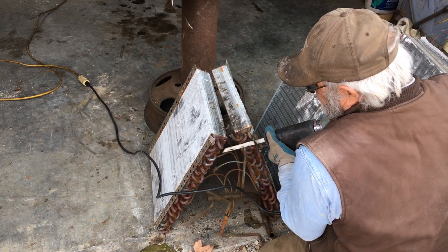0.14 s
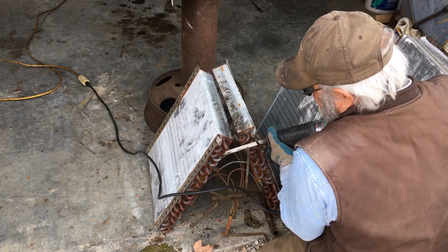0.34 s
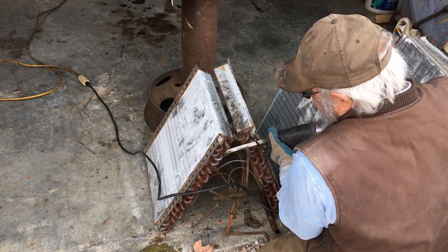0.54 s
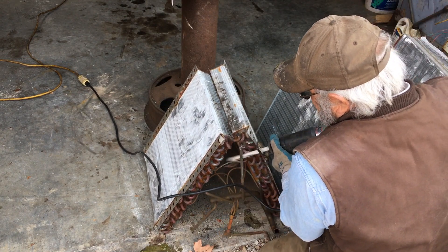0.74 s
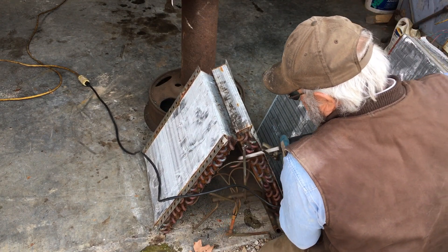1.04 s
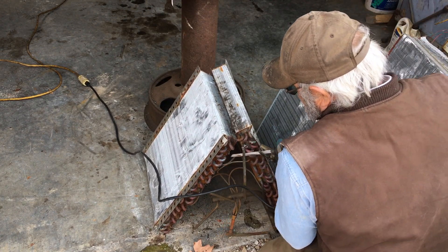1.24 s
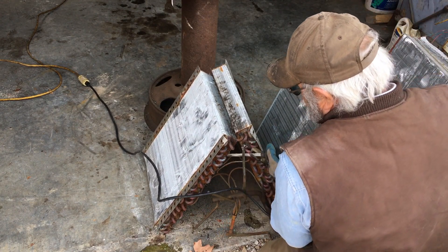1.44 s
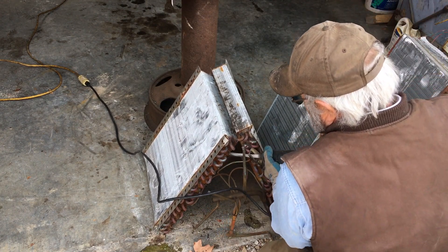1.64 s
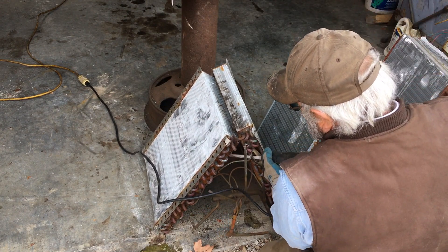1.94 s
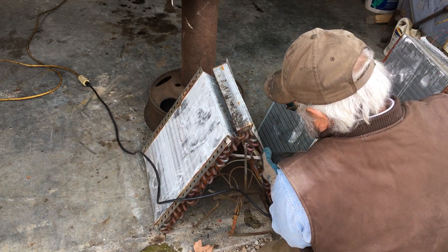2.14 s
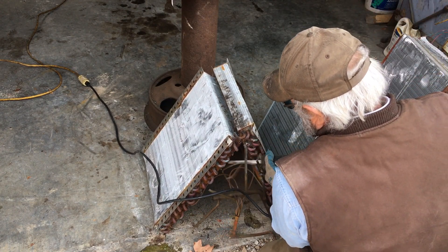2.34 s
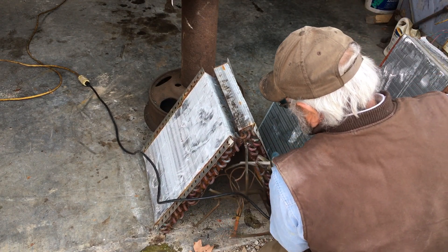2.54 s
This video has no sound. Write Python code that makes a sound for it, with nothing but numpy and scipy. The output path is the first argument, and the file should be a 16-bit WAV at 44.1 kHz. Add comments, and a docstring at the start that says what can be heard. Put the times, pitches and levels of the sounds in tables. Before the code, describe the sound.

Close by over a concrete floor, an electric reciprocating saw bites into ringing copper tubing. It winds down with metallic knocks and scrapes, then whines back up into a second rattling cut that shakes the coil.

```python
"""Reciprocating saw on a copper coil

A corded saw cuts the tubes, close by in an open workspace. It runs, coasts almost to rest, speeds up
and begins to slow. Teeth rasp twice a stroke and bite in; gears rattle in their housing; the loose
blade knocks and pings in two spells. The tube rings and groans and the coil frame shakes."""
import sys
import numpy as np
from scipy import signal
from scipy.fft import rfft, irfft
from scipy.io import wavfile

SR = 44100
rng = np.random.default_rng(int(sys.argv[2]) if len(sys.argv) > 2 else 0)


def waveform_to_disk(signal):
    """Save audio, clipped to [-1, 1], as 16-bit WAV at the path in sys.argv[1]."""
    frames = np.transpose(np.atleast_2d(signal))
    scaled = np.clip(frames, -1, 1) * 32767
    samples = np.round(scaled).astype(np.int16)
    wavfile.write(sys.argv[1], SR, samples)


N = 119070
FFT_SIZE, TOP_HZ = 2 ** 18, 16000
T, HZ = np.arange(N) / SR, np.arange(FFT_SIZE // 2 + 1) * SR / FFT_SIZE + 1e-6
TEETH_PER_STROKE, TOOTH_SCATTER_DB, RING_WIDTH_HZ = 90, 3.5, 22.6

# saw speed (time [s], stroke rate [Hz])
STROKE_RATE = [(0, 30.4), (.2, 31.8), (.45, 28), (.65, 30.2), (.85, 36.5), (.98, 34.3), (1.1, 25.2),
               (1.25, 20.2), (1.45, 15.2), (1.66, 11.63), (1.76, 26), (1.95, 37), (2.15, 40), (2.5, 41),
               (2.7, 30.5)]

# envelopes (time [s], relative level [dB])
RASP_LEVEL = [(0, -33), (.17, -28.5), (.27, -25), (.32, -27.5), (.43, -30.5), (.55, -31.5), (.82, -33.5),
              (.89, -27.5), (1.02, -36), (1.14, -39), (1.27, -45.5), (1.5, -45.5), (1.665, -51),
              (1.73, -35), (1.88, -36), (1.97, -30.5), (2.25, -28.5), (2.32, -33), (2.44, -30), (2.64, -33),
              (2.7, -37)]
GEAR_LEVEL = [(0, -26), (.05, -30.5), (.24, -29.5), (.4, -27), (.62, -32), (.82, -30), (.95, -28.5),
              (1.1, -31), (1.22, -37.5), (1.45, -40), (1.62, -43), (1.68, -39.5), (1.78, -31.5), (2, -27.5),
              (2.17, -26), (2.27, -28), (2.3, -29), (2.5, -30), (2.7, -34.5)]
TUBE_LEVEL = [(0, -41), (.15, -32), (.33, -30.5), (.44, -34), (.68, -36), (.85, -43), (1.7, -72),
              (1.82, -35.5), (1.92, -41), (2.7, -41)]
FRAME_LEVEL = [(0, -44), (.2, -44.5), (.41, -37.5), (.58, -40.5), (.79, -40.5), (.85, -49), (1.15, -49),
               (1.35, -54.5), (1.65, -54), (1.8, -49.5), (2.22, -43), (2.37, -46), (2.52, -44),
               (2.6, -48.5)]

# hard tooth bites (time [s], relative peak [dB], hold [strokes])
BITES = [(0.1975, -14, 0.27), (0.2443, -12, 0.19), (0.261, -18, 0.33), (0.2737, -12, 0.21),
         (0.3464, -11, 0.16), (0.365, -18, 0.2), (0.3845, -14, 0.17), (0.4074, -19.5, 0.38),
         (0.4584, -17.5, 0.19), (0.4924, -21, 0.21), (0.529, -14.5, 0.2), (0.546, -16, 0.23),
         (0.56, -21.5, 0.28), (0.6689, -20.5, 0.27), (0.724, -19, 0.21), (0.772, -16, 0.23),
         (0.8305, -18.5, 0.21), (1.6289, -24, 0.067), (1.6723, -29.5, 0.2), (1.706, -21.5, 0.16),
         (1.7478, -26.5, 0.21), (1.8499, -21.5, 0.28), (1.9563, -17.5, 0.27), (2.2164, -20, 0.31),
         (2.2419, -15, 0.29)]
# saw bumping the coil (time [s], relative peak [dB])
BUMPS = [(0.0034, -10), (0.279, -8), (0.299, -7), (0.388, -12), (1.298, -26), (1.757, -9), (2.0928, -9),
         (2.1425, -10.5), (2.1928, -21), (2.2445, -7), (2.2673, -7.5), (2.311, -15)]
# blade knocks (time [s], relative peak [dB], blade ping [dB], tube ring [dB])
KNOCKS = [(0.8706, -15, -31, -33), (0.895, -18, -40, -37), (0.9277, -19, -34, -32), (0.953, -17, -33, -28),
          (0.9828, -16.5, -28.5, -30), (1.038, -15, -28.5, -33), (1.072, -12, -23.5, -30),
          (1.1071, -16, -30, -28), (1.1832, -12, -27.5, -35), (1.2285, -17, -31, -41),
          (1.277, -21, -42, -33.5), (2.372, -16.5, -40, -40), (2.3969, -15, -27, -30),
          (2.421, -15, -32, -36), (2.4432, -11.5, -25, -32), (2.4688, -13, -25, -25),
          (2.4906, -16, -27, -38), (2.514, -13.5, -25, -32), (2.5426, -14, -44, -30),
          (2.655, -14.5, -42, -35), (2.6866, -13.5, -46, -32.5)]
# blade scrapes and squeaks (centre [s], level [dB], sigma [s])
SCRAPES = [(1.3, -38.5, 0.0093), (1.349, -35.5, 0.0094), (1.401, -38, 0.0076), (1.462, -33, 0.0079),
           (1.528, -34.5, 0.0044), (1.542, -34, .003), (1.556, -35.5, 0.0072)]
SQUEAKS = [(.063, -30.5, 0.0055), (.102, -25.5, 0.0051), (.16, -34, 0.017), (2, -39, 0.04)]
# tube groans (centre [s], level [dB], sigma [s], pitch [Hz])
GROANS = [(0.209, -27.5, 0.019, 1060), (0.307, -37, 0.012, 1042), (0.354, -28.5, 0.013, 925),
          (0.545, -29.5, .012, 1040)]
# motor under load (time [s], pitch [Hz], level [dB])
DRONE = [(.06, 475, -64), (.2, 462, -42.5), (.26, 440, -51), (.42, 446, -47), (.62, 430, -47.5),
         (.74, 440, -45.5), (.9, 450, -75)]
# sliding mass, stroke harmonics 1-3 (level at full speed [dB])
THROB_DB = [-70, -72, -70]

# broad spectra (frequency [Hz], relative gain [dB])
RASP_COLOUR = [(500, -12), (1400, -0.5), (2400, 2.5), (3400, 3.5), (4400, 1.5), (4900, -7), (5700, 3),
               (7500, -0.5), (10000, -2), (13000, -4.5), (16000, -10)]
BITE_COLOUR = [(500, -29), (1400, -4.5), (2600, 6), (3700, 5), (5000, 2.5), (6300, 4), (8500, 0.5),
               (10500, -0.5), (12500, -1.5), (16000, -11)]
GEAR_COLOUR = [(200, -23), (500, -13), (800, -7), (1100, -1), (1500, -0.5), (2100, -1.5), (3000, -6.5),
               (5000, -11.5), (9000, -33.5), (16000, -56)]
SCRAPE_COLOUR = [(1200, -13), (2600, -7), (3750, 2.5), (4700, -1), (5600, -10), (7000, -7.5), (10000, -8.5),
                 (12500, -7), (16000, -12)]
FRAME_COLOUR = [(20, -30), (32, -10), (43, -3), (54, -6), (70, 1.5), (98, 0.5), (150, -4.5), (200, -0.5),
                (270, -2), (380, -3.5), (650, -4), (1100, -7.5), (3000, -62)]

# resonances and dips colouring the sawing sound (frequency [Hz], width [Hz], lift [dB])
CUT_PEAKS_AND_NOTCHES = [(3034, 68, 6), (3430, 120, 4), (3870, 27, 6), (4620, 73, 11.5), (4700, 200, -8.5),
                         (5240, 105, 4.5), (5780, 100, -2.5), (6500, 91, 5), (7500, 59, -14),
                         (10340, 410, -6)]
# resonances (frequency [Hz], width [Hz], lift [dB])
HOUSING_PEAKS = [(1072, 15, 1), (1393, 220, 4), (1487, 61, 2), (1594, 29, 2.5), (1710, 45, 7),
                 (2096, 75, 3)]
FRAME_PEAKS = [(119, 19, 7.4), (200, 10, 2.1), (453, 14, 7.1)]

# ringing modes (frequency [Hz], width [Hz], relative gain [dB])
BLADE_MODES = [(5820, 70, -2), (6440, 60, -8), (7200, 51, -2), (8200, 78, -2), (9140, 70, -2),
               (10100, 110, 0), (11860, 410, -4.5), (14300, 400, -7.5)]
SQUEAK_MODES = [(5930, 110, -2), (6400, 90, -1), (7300, 140, -1), (8060, 140, -5)]
TUBE_MODES = [(662, 31, -13), (932, 13, -3.5), (1012, 58, -7.5), (1059, 28, -4.5), (1610, 100, -7.5)]


def tooth_rasp(stroke, depth=0.49, return_gain=0.6, scatter_db=2, grip_half_strokes=0.63):
    """Teeth tear the copper on the pull, more softly on the return."""
    teeth = grit(stroke)
    half_stroke = (2 * stroke).astype(int)
    force = undb(scatter_db * rng.standard_normal(half_stroke[-1] + 1))[half_stroke]
    force *= np.where(half_stroke % 2, return_gain, 1)
    grip = np.exp(-(2 * stroke % 1 / grip_half_strokes) ** 2)
    envelope = unit_rms(1 - depth + depth * force * grip) * undb(curve(RASP_LEVEL))
    return body(teeth * envelope, RASP_COLOUR, CUT_PEAKS_AND_NOTCHES)


def tooth_bites(stroke, gain_db=-10, attack_s=0.00025, release_s=0.0063):
    """Teeth dig in hard for a fraction of a stroke."""
    envelope = np.zeros(N)
    for start_s, db, hold_strokes in BITES:
        end_s = start_s + hold_strokes / np.interp(start_s, *np.array(STROKE_RATE).T)
        rise = np.clip((T - start_s) / attack_s, 0, 1)
        envelope += undb(db + gain_db) * rise * np.exp(-np.maximum(T - end_s, 0) / release_s)
    return body(grit(stroke) * envelope, BITE_COLOUR, CUT_PEAKS_AND_NOTCHES)


def gear_housing(stroke, clicks_per_stroke=48, load_depth=0.23, bump_gain_db=-12):
    """Gear clatter, hardest at the stroke ends, and bumps against the coil excite the housing."""
    clatter = unit_rms(clicks(stroke * clicks_per_stroke, scatter_db=2.5) + 0.83 * noise())
    load = unit_rms(1 + load_depth * np.cos(2 * np.pi * 2 * stroke))
    bumps = undb(bump_gain_db) * blows(BUMPS, decay_s=0.0061, attack_s=0.0021) * noise()
    return body(clatter * load * undb(curve(GEAR_LEVEL)) + bumps, GEAR_COLOUR, HOUSING_PEAKS)


def blade_knocks(ping_hz=4650, tube_hz=3105, spread_s=0.0009):
    """The loose blade slaps the cut, chatters and pings; the struck tube rings."""
    times_s, knock_db, ping_db, tube_db = np.array(KNOCKS).T
    hits = list(zip(times_s, knock_db))
    impulses = sum(undb(db) * (np.arange(N) == int(time_s * SR)) for time_s, db in hits)
    # bending waves: treble arrives first
    dispersion = np.exp(-2j * np.pi * spread_s * np.sqrt(HZ * TOP_HZ))
    slaps = undb(-1.5) * filtered(impulses, dispersion)
    chatter = undb(-12) * noise() * blows(hits, decay_s=0.0051)
    crack = undb(-14) * body(noise() * blows(hits, decay_s=0.0085), BITE_COLOUR, CUT_PEAKS_AND_NOTCHES)
    ping = tone(ping_hz, RING_WIDTH_HZ) * blows(zip(times_s, ping_db), decay_s=0.0029, attack_s=0.0021)
    tube = tone(tube_hz, RING_WIDTH_HZ) * blows(zip(times_s, tube_db), decay_s=0.0076, attack_s=0.0021)
    return ring(slaps + chatter, BLADE_MODES) + crack + ping + tube


def blade_drag(stroke):
    """The blade scrapes tooth by tooth when slow and squeaks when it binds."""
    scrapes = body(grit(stroke, hiss=0.3) * swells(SCRAPES), SCRAPE_COLOUR, CUT_PEAKS_AND_NOTCHES)
    squeaks = ring(noise() * swells(SQUEAKS), SQUEAK_MODES)
    return scrapes + squeaks


def copper_tube(stroke):
    """The tube rings while the teeth grip and groans as they catch."""
    teeth = clicks(stroke * TEETH_PER_STROKE, TOOTH_SCATTER_DB) * undb(curve(TUBE_LEVEL))
    groans = sum(tone(hz, RING_WIDTH_HZ) * swells([swell]) for *swell, hz in GROANS)
    return ring(teeth, TUBE_MODES) + groans


def coil_frame(stroke, jolts_per_stroke=8):
    """The frame rumbles under the saw's jolts."""
    jolts = unit_rms(clicks(stroke * jolts_per_stroke, scatter_db=2.5) + noise())
    return body(jolts * undb(curve(FRAME_LEVEL)), FRAME_COLOUR, FRAME_PEAKS)


def motor(surge_s=1.742, surge_db=-36.5, sigma_s=0.015, whine_hz=2330, rise_hz_per_s=12000):
    """The motor drones under load and gives a rough rising whine as it speeds up again."""
    pitch_hz = whine_hz + rise_hz_per_s * (T - surge_s)
    whine = tone(pitch_hz, width_hz=111.9) * swells([(surge_s, surge_db, sigma_s)])
    times_s, drone_hz, drone_db = np.array(DRONE).T
    drone = tone(np.interp(T, times_s, drone_hz), width_hz=16.1) * undb(np.interp(T, times_s, drone_db))
    return whine + drone


def throb(stroke):
    """The sliding mass throbs with the fourth power of speed."""
    rate_hz = curve(STROKE_RATE)
    beat = sum(undb(db) * np.sin(2 * np.pi * (k * stroke + rng.random()))
               for k, db in enumerate(THROB_DB, 1))
    return np.sqrt(2) * beat * (rate_hz / rate_hz.max()) ** 4


def hum():
    """Faint, steady low hum."""
    return undb(-64) * tone(hz=116, width_hz=1.73)


def reflections(direct, gain_db=-12.5, t60_s=0.19, delay_s=0.0027):
    """Short tail off the surrounding concrete."""
    tail = noise() * (T > delay_s) * np.exp(-np.log(1000) * T / t60_s)
    return undb(gain_db) * filtered(direct, rfft(tail, FFT_SIZE))


def grit(stroke, hiss=0.53):
    """Tooth clicks plus hiss, rms 1."""
    return unit_rms(clicks(stroke * TEETH_PER_STROKE, TOOTH_SCATTER_DB) + hiss * noise())


def clicks(cycles, scatter_db):
    """One click per cycle, jittered, of random size and sign; rms 1."""
    onsets = np.flatnonzero(np.diff(np.floor(cycles)) > 0)
    gaps = np.gradient(onsets)
    jitter, size, sign = rng.standard_normal((len(onsets), 3)).T
    onsets = np.clip(onsets + (0.2 * jitter * gaps).astype(int), 0, N - 1)
    train = np.zeros(N)
    train[onsets] = undb(scatter_db * size) * np.sign(sign) * np.sqrt(gaps)
    return unit_rms(train)


def tone(hz, width_hz):
    """Sine broadened by phase drift, rms 1."""
    drift = np.sqrt(2 * np.pi * width_hz / SR) * noise()
    return np.sqrt(2) * np.sin(np.cumsum(2 * np.pi * hz / SR + drift))


def blows(rows, decay_s, attack_s=0.0016):
    """Envelope of linear attacks and exponential decays."""
    return sum(undb(db) * np.clip((T - start_s) / attack_s, 0, 1)
               * np.exp(-np.maximum(T - start_s - attack_s, 0) / decay_s) for start_s, db in rows)


def swells(rows):
    """Envelope of Gaussian swells."""
    return sum(undb(db) * np.exp(-0.5 * ((T - mid_s) / sigma_s) ** 2) for mid_s, db, sigma_s in rows)


def body(x, colour, peaks):
    """Minimum-phase filter: broad colour plus peaks and dips."""
    colour_hz, colour_db = np.array(colour).T
    broad_db = np.interp(np.log(HZ), np.log(colour_hz), colour_db)
    peaks_db = sum(db / (1 + (2 * (HZ - hz) / width_hz) ** 2) for hz, width_hz, db in peaks)
    cepstrum = irfft(np.log(undb(broad_db + peaks_db)))[:FFT_SIZE // 2]
    causal = np.r_[cepstrum[0], 2 * cepstrum[1:]]
    return filtered(x, np.exp(rfft(causal, FFT_SIZE)))


def ring(x, modes):
    """Bank of decaying modes."""
    response = sum(undb(db) / (1 + 1j * (HZ / hz - hz / HZ) * hz / width_hz) for hz, width_hz, db in modes)
    return filtered(x, response)


def filtered(x, response):
    """Filter at unit power gain for white noise."""
    return irfft(rfft(x, FFT_SIZE) * unit_rms(response))[:N]


def curve(rows):
    """Linear interpolation of (time [s], value) rows."""
    return np.interp(T, *np.array(rows).T)


def noise():
    """White noise."""
    return rng.standard_normal(N)


def unit_rms(x):
    """Scale to rms 1."""
    return x / np.sqrt(np.mean(abs(x) ** 2))


def undb(db):
    """Decibels to gain."""
    return 10 ** (np.asarray(db) / 20)


def scene():
    """Saw, coil and reflections, mono."""
    stroke = np.cumsum(curve(STROKE_RATE)) / SR  # strokes elapsed
    drive = gear_housing(stroke) + motor()
    cut = tooth_rasp(stroke) + tooth_bites(stroke) + blade_drag(stroke) + blade_knocks()
    coil = copper_tube(stroke) + coil_frame(stroke)
    direct = drive + cut + coil + throb(stroke) + hum()
    return (direct + reflections(direct))[None]


def record(dry, low_cut_hz=33):
    """Cut the deepest rumble and the top treble."""
    highpass = signal.butter(4, low_cut_hz, "high", fs=SR, output="sos")
    lowpass = signal.ellip(10, 0.2, 80, TOP_HZ, fs=SR, output="sos")
    return signal.sosfilt(lowpass, signal.sosfilt(highpass, dry))


dry = scene()
out = record(dry)
waveform_to_disk(out)
```